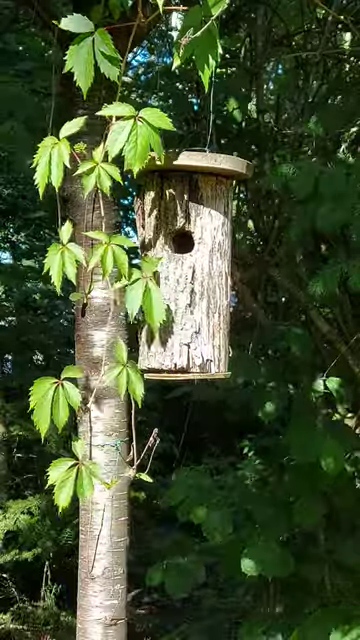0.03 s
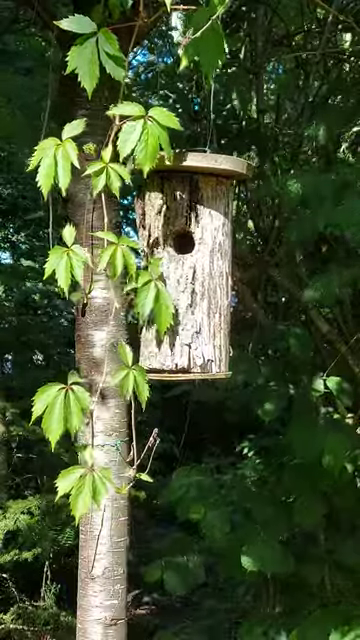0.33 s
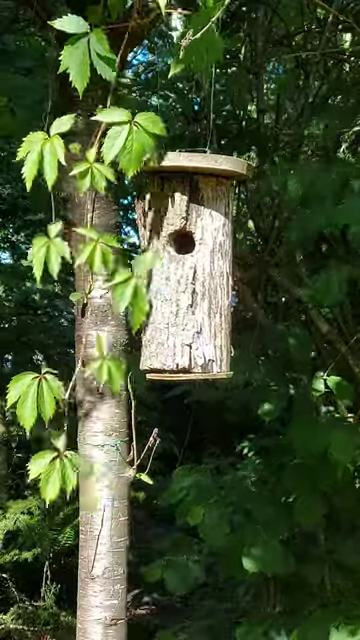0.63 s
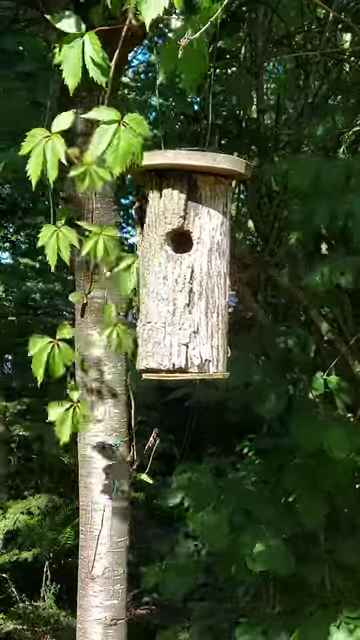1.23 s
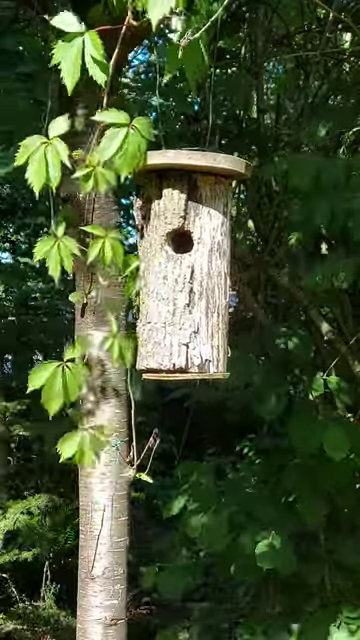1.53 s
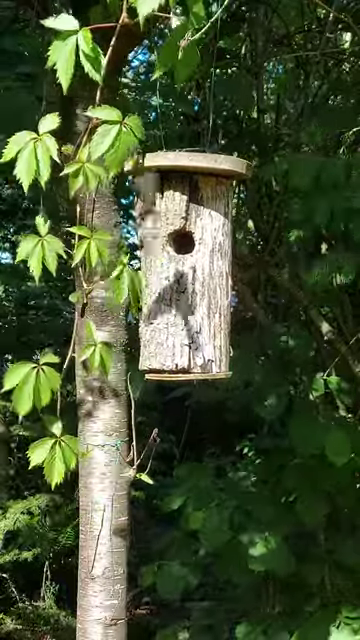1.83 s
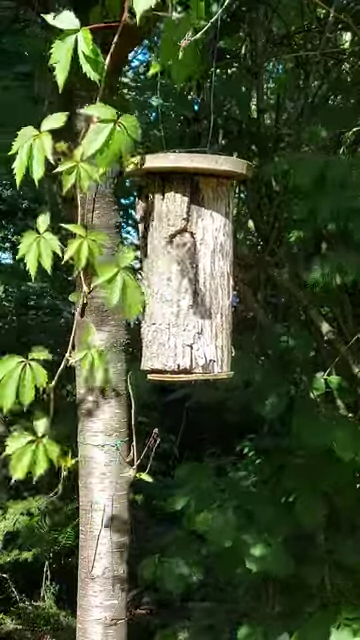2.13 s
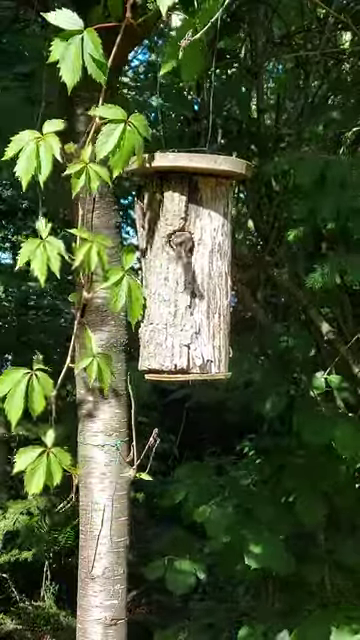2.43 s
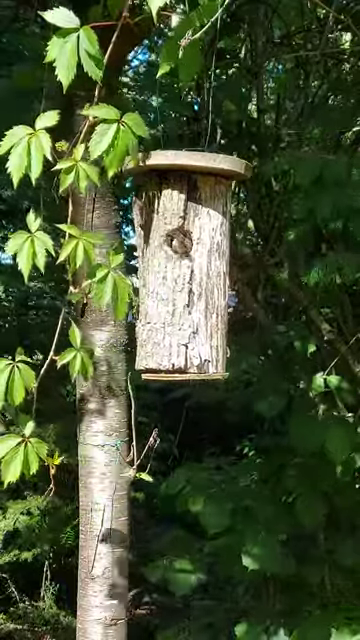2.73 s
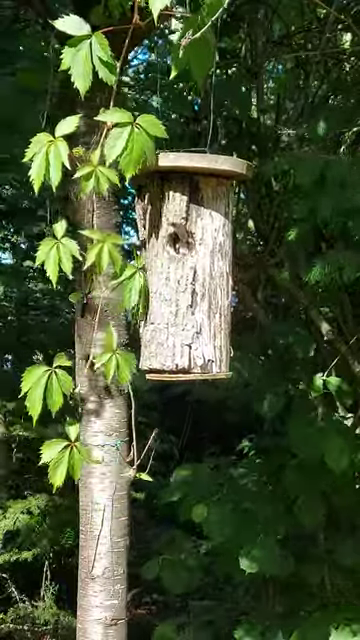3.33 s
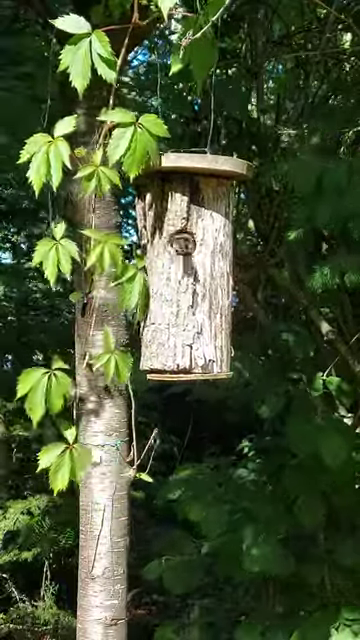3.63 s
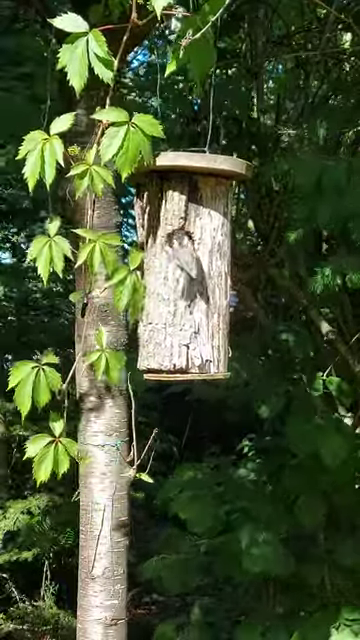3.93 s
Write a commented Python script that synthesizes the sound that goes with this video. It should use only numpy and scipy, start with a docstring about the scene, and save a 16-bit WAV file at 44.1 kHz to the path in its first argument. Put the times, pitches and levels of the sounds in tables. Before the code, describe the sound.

A small bird scolds with short harsh calls as gusts of wind buffet the microphone.

```python
"""A breeze buffets both microphone ports over a distant low rumble and a thin hiss of leaves.
Near a hanging nest box a small bird scolds in a burst of short harsh notes, each breaking from a rasp
toward a buzzing whistle and back. A brief hum passes as the bird flies over, and its claws tick on the
wood. It scolds a second time in stronger gusts; then another bird whistles far off, and the claws
tick again."""
import sys
import numpy as np
from scipy import signal
from scipy.fft import rfft, irfft, next_fast_len
from scipy.io import wavfile
from scipy.ndimage import map_coordinates

SR = 44100
rng = np.random.default_rng(int(sys.argv[2]) if len(sys.argv) > 2 else 0)


def digitize_waveform(pressure):
    """Quantize a signal to 16-bit integers and store it at the path in sys.argv[1].

    Rows of a 2-D input are taken as channels; values are limited to [-1, 1].
    """
    field = np.atleast_2d(pressure).T
    bounded = np.clip(field, -1, 1)
    quanta = np.round(bounded * 32767).astype(np.int16)
    wavfile.write(sys.argv[1], SR, quanta)


N = 176400
TIME = np.arange(N) / SR


def amp(db):
    """Decibels to gain."""
    return 10 ** (np.asarray(db) / 20)


def unit(x):
    """Scale to rms 1."""
    return x / np.sqrt(np.mean(x ** 2) + 1e-20)


def along(points, hz):
    """Read (frequency, value) points on a log axis."""
    f, v = np.transpose(points)
    return np.interp(np.log(hz + 1), np.log(f + 1), v)


def fader(points):
    """One value per sample from (time, value) points."""
    return np.interp(TIME, *np.transpose(points))


def wobble(rate, count=N):
    """A smooth random curve, rate knots a second."""
    return map_coordinates(rng.standard_normal(N // 10), [np.arange(count) * rate / SR], mode="wrap")


def ramp(u):
    """Smooth step from 0 to 1."""
    return np.sin(np.pi / 2 * np.clip(u, 0, 1))


def bump(x, centre, width):
    """Bell curve of height 1."""
    return np.exp(-((x - centre) / width) ** 2)


def phase(hz):
    """Running phase of a frequency curve."""
    return 2 * np.pi * np.cumsum(hz) / SR


def filtered(x, response):
    """x times a complex response of frequency."""
    m = next_fast_len(N + SR // 2)
    return irfft(rfft(x, m) * response(np.fft.rfftfreq(m, 1 / SR)), m)[..., :N]


def noise(spectrum):
    """Coloured noise of rms 1."""
    return unit(filtered(rng.standard_normal(N), lambda hz: amp(along(spectrum, hz))))


def noise_pair(spectrum):
    """Two unrelated noises of one colour."""
    return np.array([noise(spectrum), noise(spectrum)])


def band(hz, width_hz):
    """Noise of rms 1 through a resonance applied twice."""
    resonance = lambda f: 1j * f * width_hz / (hz * hz - f * f + 1j * f * width_hz)
    return unit(filtered(rng.standard_normal(N), lambda f: resonance(f) ** 2))


def pan(db):
    """Constant-power gains; positive is left."""
    g = amp(np.array([[.5], [-.5]]) * db)
    return g / np.sqrt(np.mean(g ** 2, axis=0))


def placed(x, pan_db, lead_s):
    """Pan by level and by arrival time; positive favours the left."""
    return pan(pan_db) * filtered(x, lambda hz: np.exp(1j * np.pi * hz * lead_s * np.array([[1], [-1]])))


def add(track, start, x):
    """Mix x into the track from start, in seconds."""
    i = round(start * SR)
    track[i:i + len(x)] += x[:len(track) - i]


def trees(x, t60=.22):
    """Diffuse echo from trunks and leaves."""
    t = TIME[:SR // 2]
    tail = rng.standard_normal((2, len(t))) * amp(-60 * t / t60)
    return signal.fftconvolve(x[None], tail / np.linalg.norm(tail[0]), axes=1)[:, :N]


FAR_PAN_DB, FAR_LEAD_S = 1, .0001
# Stereo image of the far noise (frequency [Hz], left-right likeness [0-1])
FAR_LIKENESS = [(100, 1), (450, 0.85), (850, 0.65), (4000, 0.24)]


def distant(spectrum, levels):
    """Far noise, nearly mono in the bass and wider above."""
    spread = lambda hz: np.arccos(np.clip(along(FAR_LIKENESS, hz), -1, 1)) / 2
    mid, side = filtered(noise_pair(spectrum), lambda f: np.array([np.cos(spread(f)), np.sin(spread(f))]))
    stereo = placed(np.array([mid + side, mid - side]), FAR_PAN_DB, FAR_LEAD_S)
    return stereo * amp(fader(levels) + .43 * wobble(16))


# Fader rides of the low roar and the rush above it (time [s], relative level [dB])
ROAR_RIDE = [(0, -50.5), (.8, -49.5), (1.05, -45), (1.4, -47.5), (2, -46.5), (2.6, -52), (3.3, -54),
             (4, -52)]
RUSH_RIDE = [(0, -62.5), (1.2, -57), (2.4, -58.5), (4, -57.5)]
# Their colours (frequency [Hz], gain [dB])
ROAR_EQ = [(25, -1), (65, -4), (135, 5), (190, -2.5), (260, -4), (450, -6), (620, -12), (1000, -32.5),
           (8000, -100)]
RUSH_EQ = [(300, -5.5), (650, 0), (950, -1), (1500, -15), (8000, -70.5)]
# Narrow bands in the roar (frequency [Hz], level against its ride [dB])
DRONES = [(252, -5), (305, -9.5), (368, -8), (452, -10.5)]


def rumble():
    """A distant roar with droning bands swells and fades under a steadier rush."""
    roar = amp(4) * distant(ROAR_EQ, ROAR_RIDE)
    drone = amp(fader(ROAR_RIDE)) * sum(amp(db) * band(hz, width_hz=20) for hz, db in DRONES)
    return roar + placed(drone, FAR_PAN_DB, FAR_LEAD_S) + distant(RUSH_EQ, RUSH_RIDE)


# Colour of leaf and feather noise (frequency [Hz], gain [dB])
RUSTLE_EQ = [(800, 14.5), (2000, 6.5), (3000, 2), (4500, 4), (7200, 5.5), (9000, -0.5), (11500, 3),
             (14000, -1), (15500, -7)]
# Its lean to either side (frequency [Hz], pan [dB])
RUSTLE_PAN = [(2000, 1), (5000, 4), (7000, -4.5), (10000, 6.5), (15000, 5)]


def rustle():
    """Wide, airy noise for leaves and wings."""
    return filtered(noise_pair(RUSTLE_EQ), lambda hz: pan(along(RUSTLE_PAN, hz)))


# Fader ride of the leaves (time [s], relative level [dB])
LEAF_RIDE = [(0, -74.5), (.8, -77.5), (1.4, -75), (2.3, -76.5), (2.62, -73.5), (3.6, -79), (3.86, -76),
             (4, -81.5)]


def leaves(gain_db=9.5, flicker_db=.5):
    """Leaves hiss thinly, with a slight flicker."""
    return rustle() * amp(fader(LEAF_RIDE) + gain_db + flicker_db * wobble(60))


# Gusts at each port (time [s], relative level [dB])
LEFT_GUSTS = [(0, -60), (.85, -61), (1.05, -39), (1.6, -56), (2.15, -46), (2.28, -29.5), (2.5, -31.5),
              (2.7, -37), (3.1, -36.5), (3.35, -44), (4, -40)]
RIGHT_GUSTS = [(0, -64), (.9, -52.5), (1.17, -34), (1.55, -39), (1.66, -29.5), (1.87, -37), (2.018, -26.5),
               (2.33, -32.5), (2.45, -26.5), (2.65, -33.5), (2.87, -23), (3.06, -29.5), (3.16, -27.5),
               (3.28, -38), (3.8, -44), (4, -45.5)]
# Deep buffeting and finer turbulence (frequency [Hz], gain [dB])
BUFFET_EQ = [(22, -39), (55, 1), (130, -7), (200, -19.5), (500, -39), (3000, -120)]
CHURN_EQ = [(90, -32), (160, 3.5), (250, 0), (350, 1), (500, -28.5), (3000, -110)]


def breeze(lump_db=3, churn_growth=1.37):
    """Lumpy buffeting, unrelated at the two ports; fine churn rises faster than it in a gust."""
    ports = []
    for gusts in (LEFT_GUSTS, RIGHT_GUSTS):
        db = fader(gusts)
        lumps = unit(amp(lump_db * wobble(22.185)))
        buffet = noise(BUFFET_EQ) * amp(db + 1)
        churn = noise(CHURN_EQ) * amp(db.max() - 12 + churn_growth * (db - db.max()))
        ports.append(lumps * (buffet + churn))
    return np.array(ports)


def buzzing_whistle(pitch, u, rough, first_db, second_db, pushed, buzz_hz=425):
    """A whistle with buzz sidebands; if pushed, it grows an undertone and overtones as u runs 0 to 1."""
    n = len(u)
    carrier = phase(pitch)
    buzz = phase(buzz_hz + 45 * min(.2 + 3 * rough, 2) * wobble(340, n))
    below = amp(first_db) * np.sin(carrier - buzz)
    below += amp(second_db + 3 * wobble(30, n)) * np.sin(carrier - 2 * buzz)
    above = amp(-20) * (np.sin(carrier + buzz) + np.sin(carrier + 2 * buzz) / 2)
    overtones = np.sin(1.5 * carrier) + np.sin(1.5 * carrier - 3 * buzz) + np.sin(2 * (carrier - buzz)) / 2
    strain = np.sin(carrier / 2) + overtones * (1 + wobble(850, n)) / 2
    return unit(np.sin(carrier) + below + above + pushed * amp(-17) * ramp(u) * strain)


def low_rasp(top_hz, u, rough, rattle):
    """Pulsed noise that arches up and down in pitch, wider and flatter in rough notes."""
    arch = phase(top_hz - 1100 * (1 - rough) * (2 * u - 1) ** 2)
    grit = sum(wobble(850 * (1 + rough / 2), len(u)) * wave(arch) for wave in (np.sin, np.cos))
    return unit(rattle * grit)


# Scolding notes (time [s], length [s], level [dB], pitch [Hz], rise [Hz], roughness [0-1],
# mid-note break [0-1], opening rasp [s], first lower sideband [dB], second lower sideband [dB],
# low rasp [dB], top of its arch [Hz])
SCOLD_NOTES = [(0.392, 0.11, -72, 6700, 0, 0.86, 0.1, .03, -12, -12, -5.5, 4480),
               (1.073, 0.075, -51.5, 7020, -5, 0.62, 0.1, 0.018, -14, -21, -13, 5150),
               (1.188, 0.1, -48.5, 6720, 57, 0.04, 0, 0.023, -19, -22, -15, 5700),
               (1.326, 0.11, -52, 6530, 195, 0.01, .9, 0.029, -22, -17, -9.5, 5460),
               (1.461, 0.13, -64, 6850, 107, 0.52, 0.03, 0.018, -8, -14, -6, 4570),
               (1.625, .11, -74.5, 6700, 0, .9, 0, .03, -12, -10, 1, 4580),
               (2.39, .11, -57, 6870, 153, 0.09, 0, 0.037, -16, -15, -14, 5730),
               (2.531, .14, -54.5, 7030, 483, .05, 0, 0.024, -3, -9, -21, 6060),
               (2.71, 0.15, -59, 6980, 110, 0, 0.1, 0.026, -1, -5, -21, 5700),
               (2.894, .13, -55.5, 6550, 400, 0.1, 0.46, 0.036, -13, -13, -15, 5650),
               (3.047, .14, -62.5, 6330, 110, 0.63, .4, 0.034, -12, -9, -9, 5600)]
# Colour of the main rasp (frequency [Hz], gain [dB])
RASP_EQ = [(4000, -32), (5700, -37), (6350, -11), (6800, -3.5), (7150, -10.5), (8100, -20), (8700, -42),
           (12000, -41)]


def scolding(scoop_hz=1100, rattle_hz=229.5, fade_s=.032):
    """Each note scoops up to pitch; its whistle turns to pulsed rasp at the ends and where it breaks."""
    out = np.zeros(N)
    for (start, length, db, hz, rise, rough, broken, rasp_s,
         first_db, second_db, low_db, low_hz) in SCOLD_NOTES:
        n = int(length * SR)
        t = TIME[:n]
        u = t / length
        voice_break = broken * bump(u, centre=.53, width=.1)
        glide = hz + rise * (u - .5) - scoop_hz * np.exp(-t / .012)
        pitch = glide - 260 * voice_break + (24.8 + 420 * rough) * wobble(250, n)
        whistle = buzzing_whistle(pitch, u, rough, first_db, second_db, pushed=hz + rise / 2 > 7200)
        rattle = unit(1 + .85 * np.sin(phase(rattle_hz * np.exp(.21 * wobble(208, n)))))  # uneven pulses
        rasp = rattle * noise(RASP_EQ)[:n] * amp(-2.5 * (1.5 - rough))
        low = amp(low_db) * low_rasp(low_hz, u, rough, rattle)
        middle = ramp(2 * t / rasp_s - 1) * ramp(2 * (length - t) / .019 - 1.5)
        clear = (1 - rough) * (1 - voice_break) * middle ** 2  # crossfade: 0 rasp, 1 whistle
        voice = np.sqrt(clear) * whistle + np.sqrt(1 - clear) * rasp + (1 - .54 * clear) * low
        envelope = ramp(t / fade_s) * ramp((length - t) / fade_s)
        add(out, start, voice * envelope * amp(db - 10 * voice_break + 1.5 * wobble(90, n)))
    return placed(out, pan_db=-5, lead_s=.00005) + amp(-13) * trees(out)


# Eddies hitting a port (time [s], level [dB], width [s], pan [dB])
EDDIES = [(1.641, -20, .0024, -36), (2.3225, -11, .0014, 39), (2.4705, -11, .0019, -20),
          (2.5353, -10.5, .0011, 45), (2.5995, -13, .0022, -33), (2.6115, -14, .0024, -30),
          (2.645, -16, .0018, -28), (2.8715, -15, .0026, -25), (2.9485, -14, .0028, -25),
          (3.1525, -12.5, .0018, -25)]


def eddies():
    """Each eddy thumps a port with one push and pull of pressure."""
    out = np.zeros((2, N))
    for time, db, width, pan_db in EDDIES:
        u = (TIME - time) / width
        out += pan(pan_db) * amp(db) * -u * np.exp(-u * u / 2)
    return out


def hum():
    """One brief hum rises out of the rumble."""
    swell = amp(-52) * bump(TIME, centre=1.69, width=.08)
    return placed(band(575, width_hz=130) * swell, FAR_PAN_DB, FAR_LEAD_S)


def wings(start_s=1.69, length_s=.47, beat_hz=24):
    """Wingbeats pulse a crackly feather rustle as the bird flies to the box."""
    t = TIME - start_s
    envelope = ramp(t / .026) * ramp((length_s - t) / .33)
    beat_db = 2.5 * np.sin(2 * np.pi * beat_hz * t)
    crackle_db = 3 * wobble(330)
    return rustle() * envelope * amp(-66.5 + beat_db + crackle_db)


# Claw contacts (time [s], level [dB], knock gain [dB], ring pitch [Hz])
CLAW_TICKS = [(1.9995, -58, 3, 7500), (2.0045, -54, 1, 11000), (2.051, -57, -8, 12200),
              (2.691, -57, -15, 13800), (2.712, -64, -10, 8500), (3.807, -60, -8, 13000),
              (3.8195, -52.5, -6, 12000)]
# Colour of the crack (frequency [Hz], gain [dB])
CRACK_EQ = [(1000, -17), (6500, 0), (16000, -0.5)]
# Modes of the wooden box (frequency [Hz], level [dB], decay by 60 dB [s])
BOX_MODES = [(2200, -8.5, .035), (6400, -5.5, .012)]


def claws(crack_t60=.021, ring_t60=.014):
    """Each contact is a crack, a brief high ring and a little knock of the box."""
    out, t = np.zeros(N), TIME[:SR // 10]
    for start, db, knock_db, hz in CLAW_TICKS:
        crack = noise(CRACK_EQ)[:len(t)] * amp(-60 * t / crack_t60)
        ring = np.sin(2 * np.pi * hz * t) * amp(-1.5 - 60 * t / ring_t60)
        knock = sum(np.sin(2 * np.pi * f * t) * amp(g - 60 * t / t60) for f, g, t60 in BOX_MODES)
        add(out, start, amp(db) * (crack + ring + amp(knock_db) * knock))
    return pan(5) * out + amp(-6) * trees(out)


# Short gusts (time [s], half length [s], level [dB], pan [dB])
PUFFS = [(2.674, 0.058, -31, -20), (3.19, 0.034, -32, -16)]
# Their colour (frequency [Hz], gain [dB])
PUFF_EQ = [(60, 2), (120, 4.5), (170, -0.5), (280, -3), (3000, -110)]


def puffs():
    """Short puffs of fine turbulence brush the right port."""
    return sum(pan(pan_db) * noise_pair(PUFF_EQ) * amp(db) * bump(TIME, time, width)
               for time, width, db, pan_db in PUFFS)


# The far bird's call (time [s], length [s], level [dB], pitch [Hz], glide [Hz])
FAR_WHISTLES = [(3.21, .14, -75, 4030, -30), (3.46, .12, -81, 4040, -80), (3.70, .12, -79, 4020, 0)]


def far_bird(waver_hz=40):
    """Thin wavering whistles, about half of their sound an echo from the trees."""
    out = np.zeros(N)
    for start, length, db, hz, glide in FAR_WHISTLES:
        u = np.linspace(0, 1, int(length * SR))
        pitch = hz + glide * (u - .5) + waver_hz * wobble(200, len(u))
        add(out, start, amp(db) * np.sin(np.pi * u) * np.sin(phase(pitch)))
    return out + amp(-.5) * trees(out)


def scene():
    """The outdoor bed, then the events in order of entry."""
    bed = rumble() + leaves() + breeze()
    return bed + scolding() + eddies() + hum() + wings() + claws() + puffs() + far_bird()


def record(dry, low_cut_hz=40, top_hz=15600):
    """The camera cuts the deepest bass and keeps nothing above its band limit."""
    return filtered(dry, lambda hz: (hz < top_hz) * (1 - np.exp(-(hz / low_cut_hz) ** 2)))


dry = scene()
out = record(dry)
digitize_waveform(out)
```